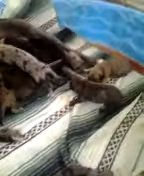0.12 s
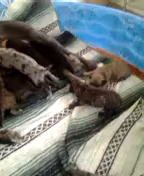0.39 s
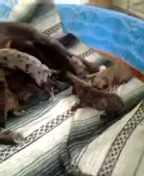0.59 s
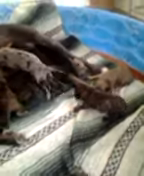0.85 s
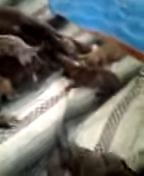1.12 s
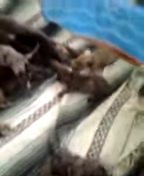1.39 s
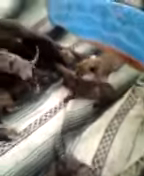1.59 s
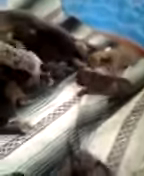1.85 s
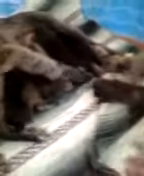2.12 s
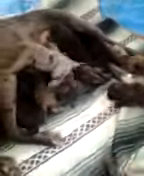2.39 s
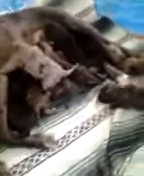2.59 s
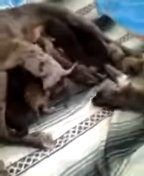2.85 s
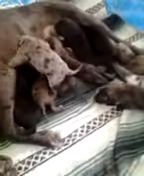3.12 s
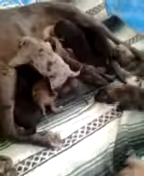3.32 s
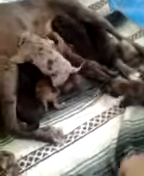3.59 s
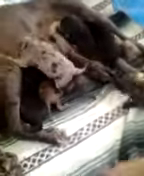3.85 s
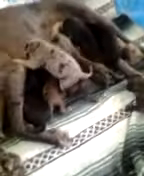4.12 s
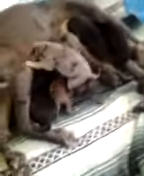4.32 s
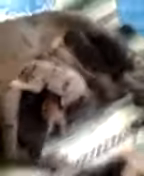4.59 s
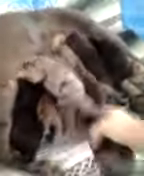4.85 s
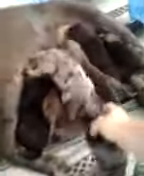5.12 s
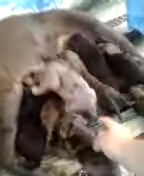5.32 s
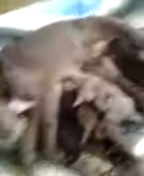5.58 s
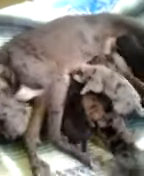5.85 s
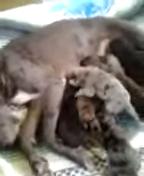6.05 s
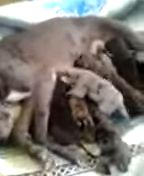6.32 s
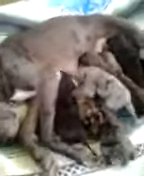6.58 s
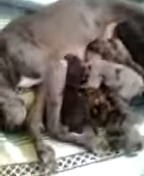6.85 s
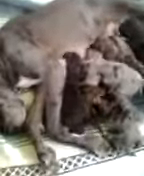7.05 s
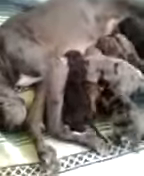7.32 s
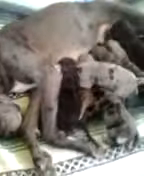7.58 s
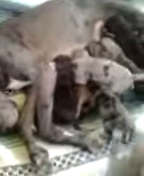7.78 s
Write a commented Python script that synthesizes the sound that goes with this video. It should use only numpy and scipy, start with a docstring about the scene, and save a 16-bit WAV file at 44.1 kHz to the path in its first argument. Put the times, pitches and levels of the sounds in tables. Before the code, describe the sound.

Hoarse puppy screams and sharp, distorting squeals give way to scattered short whines, low grunts and light cloth rubs in a small quiet room.

```python
"""Indoors on a blanket, newborn puppies crowd their mother close to a phone with a narrow-band microphone.
One pup gives hoarse screams, a trill and piercing squeals that overload the input; others whimper and grunt.
Voices are stacks of wavering harmonics, shaped by throat and mouth; breath, rustle and puffs are shaped noise.
Small ticks of paws are short ringing bursts, a short room ring follows voices and rasp, and the floor is quiet."""
import sys
import numpy as np
from scipy import signal
from scipy.fft import rfft, irfft
from scipy.io import wavfile
from scipy.ndimage import uniform_filter1d

SR = 44100
rng = np.random.default_rng(int(sys.argv[2]) if len(sys.argv) > 2 else 0)


def how_loud(loudness_db):
    """Turn decibels into a plain amplitude multiplier (0 dB gives 1, 20 dB gives 10)."""
    steps = np.asarray(loudness_db, float) / 20
    return 10 ** steps


def transcribe(u):
    """Save the signal u as a 16-bit wav file named by the first command-line argument.

    u: samples, shape (n,) or (channels, n), limited to [-1, 1]; the rate is SR.
    q: integer samples, one column per channel.
    """
    v = np.clip(np.atleast_2d(u).T, -1, 1)
    q = np.round(v * 32767).astype(np.int16)
    wavfile.write(sys.argv[1], SR, q)


N = 350154  # length [samples]

# Colour of the quiet background noise: (frequency [Hz], relative level [dB])
FLOOR_COLOUR = [(18, -57), (30, -28.5), (70, -10), (394, 1), (751, 5.5), (1110, -9), (1430, -7),
                (1910, -9.5), (2310, -1.5), (3280, -8.5), (4300, -25.5), (5590, -47.5), (9460, -120)]
# Steady rustle of the litter: (time [s], low part [dB], high part [dB])
RUSTLE = [(0, -56, -77.5), (.12, -53.5, -76), (.9, -57.5, -47.5), (1.06, -65, -55), (1.2, -61, -54),
          (1.902, -52, -54), (2.009, -62, -43), (2.258, -61.5, -48.5), (2.9, -58.5, -53), (3.3, -46.5, -51),
          (3.752, -60.5, -65.5), (4.029, -47.5, -51), (4.39, -60, -57.5), (4.679, -48.5, -51),
          (4.79, -57.5, -50.5), (5.249, -54, -50), (5.5, -56, -51), (6.0, -54.5, -51), (6.56, -67, -54.5),
          (7.101, -60, -54.5), (7.6, -53, -50), (7.94, -55, -70)]
# Colour of the low part of breath and rubbed cloth: (frequency [Hz], relative level [dB])
RASP_LOW_COLOUR = [(24, -66), (40, -26), (203, -18), (279, -15.5), (446, -12), (682, -8), (923, -3.5),
                   (1500, -5), (1950, -12), (3300, -120)]
# Colour of the high part when it is strong: (frequency [Hz], relative level [dB])
RASP_STRONG_COLOUR = [(880, -26.5), (1500, 2.5), (1800, -1.5), (2120, 3.5), (2550, -1), (3000, 1.5),
                      (3320, -8.5), (4300, -41), (5590, -60), (9460, -120)]
# Colour of the high part when it is gentle: (frequency [Hz], relative level [dB])
RASP_GENTLE_COLOUR = [(880, -37.5), (1500, -7.5), (1850, -1.5), (2010, -6), (2180, 2.5), (2930, -9),
                      (3200, -7.5), (3360, -10), (4300, -42), (5590, -69), (9460, -120)]
# How the throat favours some frequencies: (frequency [Hz], boost [dB])
THROAT = [(200, 1), (1000, 1.5), (1500, 2.5), (2000, 4), (2600, -1), (3100, 1), (3700, -10), (4400, -31),
          (9000, -90)]
# Soft whimpers: (start [s], length [s], start pitch [Hz], end pitch [Hz], level at the peak [dB],
#                 mouth resonance [multiple of the pitch])
WHIMPERS = [ (0.115, .04, 389, 413, -32, 2.6), (2.715, 0.141, 442.4, 566, -41, 1.6),
            (3.23, .16, 552, 671, -44, 1.2), (3.902, 0.092, 757.2, 785, -35.5, 1.3),
            (3.946, 0.055, 798, 795, -23, 1.55), (4.166, 0.086, 378.3, 494, -28.5, 2.3),
            (4.62, .05, 745, 725, -32, .9), (4.675, .1, 705, 770, -29, .8),
            (5.123, 0.088, 755.5, 695.7, -31.5, 1.5), (5.675, 0.054, 757, 721, -37, .8),
            (5.846, 0.0218, 626, 625, -40.5, .9), (5.895, 0.076, 729, 667, -33, .7),
            (6.049, 0.015, 607.6, 680, -35, .9), (6.107, 0.12, 713.8, 692.2, -31.5, 1.05),
            (6.365, 0.1015, 723, 717, -27.5, .9), (6.39, 0.1157, 880, 913, -36, .6),
            (6.633, 0.068, 724, 729, -24, .8), (6.676, 0.053, 440, 454, -36.5, 2.05),
            (6.911, 0.096, 735, 744, -28.5, .8), (7.148, 0.149, 953.4, 1026, -34, .6),
            (7.223, 0.0466, 900, 1110, -27.5, .9), (7.274, .04, 1000, 940, -33.5, 1.1),
            (7.528, 0.029, 666.2, 660, -33.5, 1.9), (7.546, 0.038, 363, 315, -36.5, 1.2),
            (7.744, 0.06, 679, 686, -27.5, 1.7), (7.787, 0.0468, 340.4, 353, -34, 1.4), ]
# Loud cries, one curve each: (time [s], pitch [Hz], voice level [dB],
#                              mouth resonance [multiple of the pitch], breath level [dB])
CRIES = [
    [(.148, 1134, -33, 1.2, -45), (.157, 1092, -15, 1.4, -26), (.179, 1183, -14, 1.3, -19),
     (.2, 1441, -12.5, 1.3, -18), (.24, 1458, -12, 1.6, -16), (.272, 1116, -15.5, 1.5, -14.5),
     (.28, 997, -17, 2.7, -20.5), (.335, 931.4, -29, 2.8, -29.5), (.381, 973.1, -26.5, 1.6, -29.5),
     (.467, 910.8, -24, 2.1, -27), (.52, 960.7, -17, 2.6, -25), (.556, 1018, -17, 2.7, -22),
     (.6, 1032, -16, 2.5, -18), (.628, 1087, -25, 2.1, -14), (.666, 1050, -32.5, 2.1, -21),
     (.724, 1086, -40, 2.1, -25.5), (.77, 1004, -40, 2.1, -39), (.83, 983, -61, 2.1, -56)],
    [(1.215, 596, -40.5, 2.1, -48), (1.229, 645.4, -29, 2.1, -43.5), (1.255, 850, -29, 2.1, -28),
     (1.27, 950, -14, 2.4, -19), (1.286, 1017, -14, 2.6, -15), (1.356, 1135, -15, 1.9, -21),
     (1.382, 1005, -15, 2.5, -25.5), (1.418, 1095, -21.5, 2.4, -25.5), (1.46, 884, -23.5, 2.1, -26.5),
     (1.475, 1386, -22.5, 1.2, -33), (1.52, 1183, -23, 1.1, -30.5), (1.545, 1221, -28.5, 1.3, -32),
     (1.565, 1146, -21.5, 1.5, -31), (1.6, 1212, -22.5, 1.4, -30.5), (1.62, 1102, -21, 1.3, -34),
     (1.66, 1117, -22, 1.6, -29), (1.68, 1004, -30.5, 1.1, -29), (1.784, 919, -49, 1.1, -32),
     (1.885, 972, -67, 1.1, -72.5)],
    [(2.92, 1064, -36, 1.9, -47), (2.94, 817.4, -15, 1.9, -35), (2.956, 955, -14.5, 2.1, -24.5),
     (2.98, 1228, -12, 2.2, -26), (3.0, 1295, -11, 1.45, -30), (3.03, 1402, -12, .9, -22.5),
     (3.05, 1488, -9.5, .6, -14), (3.07, 1380, -15.5, .8, -33.5), (3.085, 1284, -28, 1.2, -44.5),
     (3.11, 1008, -23, 1.9, -58.5)],
    [(3.37, 693.2, -38, 2.2, -37.5), (3.39, 773.4, -7.5, 2.05, -32.5), (3.402, 1023, -27, 2.1, -17.5),
     (3.418, 1223, -18, 1.9, -22.5), (3.485, 1348, -8.5, 1.3, -26.5), (3.5, 1473, -3.5, .7, -29),
     (3.532, 1408, -3.5, .8, -33), (3.545, 1453, -10.5, 1.15, -39), (3.58, 1457, -11.5, 1.15, -48),
     (3.636, 1465, -16.5, 1.1, -59), (3.66, 1460, -17.5, 1.2, -49), (3.69, 1428, -17, 1.2, -39),
     (3.71, 1423, -36.5, 1.35, -64), (3.86, 1435, -42.5, 1.5, -63)],
    [(4.405, 648.6, -43.5, 1.6, -47.5), (4.419, 627.6, -37, 1.2, -50.5), (4.438, 743, -30.5, 1.6, -47),
     (4.453, 836, -19.5, 2.1, -47), (4.505, 872.2, -27.5, 1.5, -43), (4.557, 893, -18, 1.9, -47.5),
     (4.6, 975, -20.5, 1.8, -29.5)],
    [(4.82, 1324, -49.5, 1.5, -40), (4.83, 1228, -13.5, 1.9, -34), (4.842, 1241, -3, 2.1, -39.5),
     (4.87, 1408, -7, 1.45, -25), (4.895, 1476, -5.5, 1.3, -17.5), (4.92, 1537, -6.5, .9, -25.5),
     (4.95, 1557, -11, 1.2, -37), (4.978, 1539, -16.5, 1.3, -44), (5.012, 1544, -7, .7, -47),
     (5.036, 1540, -8.5, .6, -57.5), (5.088, 1466, -19, 1.05, -43), (5.115, 1023, -29, 1.95, -39)],
]
# Strength of the strong-weak cycles, one entry for each cry, then the trill: (level [dB])
DOUBLING = [-10, -9, -40, -35, -45, -45, -30]
# Weight of the low breath, one entry for each cry, then the trill: (boost [dB])
CHEST = [6.5, 1.5, -2.5, -5, -3, 3, 2]
# Sharpness of the mouth resonance in a clear voice, each cry, then the trill: (loss setting [dB])
CLEAR_MOUTH = [16, 23, 28, 18.8, 12, 24, 30.3]
# A second whistle that rides beside the loud cries:
# (start [s], length [s], start pitch [Hz], end pitch [Hz], level [dB])
WHISTLES = [(.205, .075, 1300, 1020, -17), (1.265, .08, 900, 1000, -21), (0.297, 0.14, 1674, 877, -27.5),
            (0.533, 0.15, 1175, 1366, -25.5), (1.262, .065, 1380, 1300, -20),
            (3.035, .04, 1575, 1565, -11.5), (3.441, .06, 1469, 1530, -14.5),
            (3.488, .04, 3480, 3522, -32.5)]
# Ticks and smacks: (time [s], peak level [dB], centre of the ringing band [Hz], time to fade by 60 dB [s])
TICKS = [(1.078, -31.5, 2350, 0.02), (3.826, -39, 2070, 0.07), (3.885, -24.5, 1840, 0.043),
         (4.259, -43, 920, 0.044), (5.297, -25, 1860, 0.0223), (5.596, -20, 461, 0.08),
         (5.609, -24, 2390, 0.038), (5.633, -48.5, 2820, 0.036), (5.729, -28, 2098, 0.078),
         (5.951, -38, 1420, 0.04), (6.058, -30.5, 760, 0.088), (6.317, -29.5, 2140, 0.054),
         (7.044, -26, 1770, 0.18), (7.719, -33.5, 488, 0.0484), (7.89, -30, 1734, 0.061)]
# Rough low grunts: (start [s], length [s], start pitch [Hz], end pitch [Hz], level at the peak [dB],
#                    mouth resonance [multiple of the pitch])
GRUNTS = [(1.675, .07, 495, 455, -34, 1.8), (1.745, .12, 475, 522, -41.5, 1.1),
          (5.245, 0.076, 476, 440, -35.5, 0.7), (5.335, .11, 405, 415, -35.5, 2.05),
          (5.455, 0.28, 475.7, 529.8, -39, 0.38), (7.15, 0.14, 370, 376.5, -35.5, 2.6),
          (7.265, 0.086, 418.4, 509, -37, 1.4)]
# The trill between its throat flutters: (time [s], pitch [Hz], voice level [dB],
#                                         mouth resonance [multiple of the pitch], breath level [dB])
TRILL = [(2.275, 736, -32.5, 0.6, -44), (2.3, 856.2, -31.5, 0.86, -50.5), (2.32, 973.5, -15, 1.645, -35),
         (2.343, 1136, -13, 1.52, -23), (2.385, 1185, -13, 1.4, -22.5), (2.42, 1226, -11.5, 1.56, -27.5),
         (2.52, 1206, -20.5, 1.58, -35), (2.591, 1151, -12, 2.03, -43.5), (2.63, 1127, -13.5, 1.79, -46.5),
         (2.671, 1095, -21.5, 1.9, -51), (2.704, 817, -20.5, 1.6, -42.5)]
# Dips of pitch in the trill: (time of the lowest pitch [s], depth [Hz], fall time [s])
FLUTTERS = [(2.352, 300, .008), (2.397, 270, .006), (2.442, 230, .007), (2.493, 230, .008),
            (2.552, 180, .009), (2.611, 130, .011)]
# Short puffs of breath and soft rubs: (time [s], length [s], low part [dB], high part [dB])
PUFFS = [(2.729, 0.13, -32.5, -44.5), (3.821, 0.031, -44.5, -33), (3.888, 0.076, -39.5, -40),
         (5.586, .03, -33, -45), (5.598, 0.047, -35.5, -23.5), (3.66, .03, -46, -50),
         (4.198, 0.061, -35, -49), (4.626, 0.097, -33.5, -42.5), (5.099, 0.055, -47.5, -30),
         (5.366, .12, -31.5, -58), (6.425, 0.058, -34, -45), (6.944, .04, -35, -56),
         (5.709, 0.048, -36.5, -42), (5.939, 0.063, -39.5, -40.5), (6.136, 0.17, -40.5, -46.5),
         (6.306, 0.032, -43, -50), (7.033, 0.037, -40.5, -58), (7.274, 0.052, -33, -53),
         (7.61, 0.297, -61, -46.5), (7.695, 0.042, -46, -43.5)]

FLOOR_DB = -58  # middle of the wandering floor level, before it ducks
DUCK_AT_DB, DUCK_RATIO, DUCK_S = -21.5, 0.98, 0.27  # threshold, dB lost per dB above it, averaging time
SOFT_BREATH_DB = -18.5  # low breath relative to a soft call
HOARSE_MOUTH_DB = 4  # mouth loss setting when breath drowns the voice
BREATH_LOW_DB, BREATH_LOW_SLOPE = -23.5, 0.57  # low part of a cry's breath grows slower than its high part
ROOM_T60_S, ROOM_DB = 0.3656, -10.5  # time to fade by 60 dB, middle of the wandering ring level
BAND_TOP_HZ = 4085
OVERLOAD_LEVEL = 0.76  # largest sample value the input can hold


def walk(rate, n):
    """Smooth chance that turns about rate times a second; spread near 1."""
    k = max(int(SR / rate), 2)
    steps = np.repeat(rng.standard_normal(n // k + 1), k)
    return 1.2 * uniform_filter1d(uniform_filter1d(steps, k), k)[:n]


def colour(x, points):
    """Give a sound the spectrum of (Hz, dB) points, at rms 1."""
    hz, db = np.transpose(points)
    bins = np.maximum(np.arange(len(x) // 2 + 1) * SR / len(x), 1)
    gain = how_loud(np.interp(np.log(bins), np.log(hz), db))
    y = irfft(rfft(x) * gain, len(x))
    return y / np.sqrt(np.mean(y ** 2))


def add(out, start_s, x):
    """Mix a short sound in at a time."""
    i = int(start_s * SR)
    out[i:i + len(x)] += x[:len(out) - i]


def floor_ducking(loud):
    """Gain of the background noise, which sinks while a loud cry lasts and recovers after it."""
    keep = np.exp(-1 / (DUCK_S * SR))
    power = signal.lfilter([1 - keep], [1, -keep], loud ** 2)
    power_db = 10 * np.log10(power + 1e-12)
    return how_loud(-DUCK_RATIO * np.maximum(power_db - DUCK_AT_DB, 0))


def quiet_floor(voices):
    """Coloured background noise that wanders in level and ducks under the cries."""
    level = how_loud(FLOOR_DB + 6 * walk(12, N))
    return colour(rng.standard_normal(N), FLOOR_COLOUR) * level * floor_ducking(voices)


def rustle():
    """Low and high gains of the steady rustle, each flickering at its own pace."""
    s, low_db, high_db = np.transpose(RUSTLE)
    t = np.arange(N) / SR
    low = how_loud(np.interp(t, s, low_db) + 0.83 * walk(39, N))
    high = how_loud(np.interp(t, s, high_db) + 0.5 * walk(17, N))
    return np.array([low, high])


def rasp(gains):
    """Turbulent air and rubbed cloth: grainy noise in a low and a high part; harder effort is brighter."""
    low, high = (uniform_filter1d(part, int(.008 * SR)) for part in gains)  # 8 ms smoothing
    effort = np.clip((20 * np.log10(high) + 40) / 12, 0, 1)  # 0 = gentle, 1 = strong
    air = rng.standard_normal(N)
    bright = effort * colour(air, RASP_STRONG_COLOUR) + (1 - effort) * colour(air, RASP_GENTLE_COLOUR)
    dull = colour(rng.standard_normal(N), RASP_LOW_COLOUR)
    low_grain = how_loud(0.6 * walk(60, N))
    high_grain = how_loud(2.0 * walk(77, N))
    return dull * low * low_grain + bright * high * high_grain


def vocal_folds(t, hz, levels_db, jitter, shimmer_db, edge_s, half_db=-60.5):
    """Harmonics of one wavering pitch; each flickers alone, strong-weak cycles add lines half-way between."""
    waver = walk(260, len(t)) + .5 * walk(45, len(t))
    phase = 2 * np.pi * np.cumsum(hz * (1 + jitter * waver)) / SR
    fade = np.clip(np.minimum(t - t[0], t[-1] - t) / edge_s, 0, 1)
    doubling = 1 + how_loud(half_db + 0.54 * walk(21.4, len(t))) * np.cos(phase / 2)
    harmonics = 0
    for k, db in enumerate(levels_db, start=1):
        level = np.sqrt(2) * how_loud(db + shimmer_db * walk(121.2, len(t)))  # rms to peak of a sine
        harmonics = harmonics + level * np.sin(k * phase)
    return fade * doubling * harmonics


def overtones(hz, db, mouth, mouth_db):
    """Levels of five harmonics: favoured near the mouth resonance, coloured by the throat, summing to db."""
    k = np.arange(1, 6)[:, None]
    throat_hz, throat_db = np.transpose(THROAT)
    away = (k - mouth) * np.sqrt(hz / 1200)  # harmonics of a low voice lie closer
    mouth_loss_db = mouth_db * away ** 2 / np.sqrt(.5 + .5 * away ** 2)
    shape_db = np.interp(np.log(k * hz), np.log(throat_hz), throat_db) - mouth_loss_db
    shape_db = np.maximum(shape_db, shape_db.max(axis=0) - 47.5)
    return db + shape_db - 10 * np.log10(np.sum(how_loud(shape_db) ** 2, axis=0))


def soft_call(row, mouth_db, peak, rise_db, fall_db, jitter, shimmer_db, half_db):
    """A short call that swells to a peak and sinks while its pitch glides; its breath follows more gently."""
    start, length, from_hz, to_hz, db, mouth = row
    t = np.arange(0, length, 1 / SR)
    hz = from_hz + (to_hz - from_hz) * t / length
    swell_db = np.interp(t / length, [0, peak, 1], [-rise_db, 0, -fall_db])
    levels_db = overtones(hz, db + swell_db, mouth, mouth_db)
    voice = vocal_folds(t, hz, levels_db, jitter, shimmer_db, .004, half_db)
    low_breath = how_loud(db + SOFT_BREATH_DB + 0.76 * swell_db)
    return start, voice, low_breath


def whimper(row):
    """A soft call with a quick rise and a fairly steady pitch."""
    attack_s = .016
    return soft_call(row, mouth_db=25.5, peak=attack_s / row[1], rise_db=13.5, fall_db=16,
                     jitter=.027, shimmer_db=3.5, half_db=-21.)


def loud_cry(table, half_db, chest_db, clear_db, flutters=()):
    """A cry and its breath: breath near the voice level makes the folds hoarser and the mouth wider."""
    s, *columns = np.transpose(table)
    t = np.arange(s[0] - .004, s[-1] + 0.0013, 1 / SR)
    hz, db, mouth, breath_db = (np.interp(t, s, c) for c in columns)
    hoarse = np.minimum(how_loud(breath_db - db), 1)
    dip_hz = 0
    for at, depth_hz, fall_s in flutters:
        width_s = np.where(t < at, fall_s, 2.1 * fall_s)  # the pitch climbs back more slowly
        dip_hz = dip_hz + depth_hz * np.exp(-((t - at) / width_s) ** 2)
    mouth_db = clear_db + (HOARSE_MOUTH_DB - clear_db) * np.sqrt(hoarse)
    levels_db = overtones(hz, db, mouth, mouth_db)
    # in a flutter the fundamental leaves the throat resonance and the third harmonic enters the upper one
    levels_db = levels_db + np.array([[-.025], [0], [.045], [0], [0]]) * dip_hz
    jitter = .007 + .075 * hoarse ** 1.3
    voice = vocal_folds(t, hz - dip_hz, levels_db, jitter, 1.8 + 2.5 * hoarse, .006, half_db)
    low_breath = how_loud(chest_db + BREATH_LOW_DB + BREATH_LOW_SLOPE * breath_db)
    return t[0], voice, low_breath, how_loud(breath_db)


def whistle(row):
    """One gliding, wavering tone beside a cry, without breath."""
    start, length, from_hz, to_hz, db = row
    t = np.arange(0, length, 1 / SR)
    hz = from_hz + (to_hz - from_hz) * t / length
    return start, vocal_folds(t, hz, [db], .03, 3.5, .01)


def ticks():
    """A burst of noise ringing in a band at each small contact."""
    out, t = np.zeros(N), np.arange(int(.12 * SR)) / SR
    contact = 1 - np.exp(-t / .0015)  # soft paws build up over a millisecond or two
    for at, db, hz, t60 in TICKS:
        band = signal.butter(3, [hz / 1.3, hz * 1.3], "bandpass", fs=SR, output="sos")
        decay = np.exp(-np.log(1000) * t / t60)
        burst = signal.sosfilt(band, rng.standard_normal(len(t)) * contact * decay)
        add(out, at, how_loud(db) * burst / np.abs(burst).max())
    return out


def grunt(row):
    """A soft call made rough by a strongly wavering pitch."""
    return soft_call(row, mouth_db=24.5, peak=0.27, rise_db=3.5, fall_db=10,
                     jitter=.085, shimmer_db=5., half_db=-30.)


def trill():
    """A loud cry in which each throat flutter pulls the pitch down and lets it climb back."""
    return loud_cry(TRILL, DOUBLING[-1], CHEST[-1], CLEAR_MOUTH[-1], FLUTTERS)


def puffs():
    """Low and high gains of short puffs and rubs: a quick rise, then a fade."""
    gains, t = np.zeros((2, N)), np.arange(N) / SR
    for at, length, low_db, high_db in PUFFS:
        rise = np.clip((t - at) / 0.022, 0, 1)
        shape = rise * np.exp(-2.5 * np.maximum(t - at - .012, 0) / length)
        gains += how_loud([[low_db], [high_db]]) * shape
    return gains


def litter():
    """All voices, and the low and high breath gains that go with them."""
    calls = [whimper(row) for row in WHIMPERS]
    # zip stops after the last cry, so the trill's own entries are left over for trill()
    calls += [loud_cry(*settings) for settings in zip(CRIES, DOUBLING, CHEST, CLEAR_MOUTH)]
    calls += [whistle(row) for row in WHISTLES]
    calls += [grunt(row) for row in GRUNTS]
    calls.append(trill())
    tracks = np.zeros((3, N))  # voice, low breath, high breath
    for start, *layers in calls:
        for track, layer in zip(tracks, layers):
            add(track, start, layer)
    return tracks[0], tracks[1:]


def room(x):
    """A short diffuse ring off near walls; its level wavers at random."""
    t = np.arange(int(.8 * SR)) / SR
    ring = rng.standard_normal(len(t)) * np.exp(-np.log(1000) * t / ROOM_T60_S) * (t > .004)
    wet = signal.fftconvolve(x, ring / np.sqrt(np.sum(ring ** 2)))[:N]
    return x + wet * how_loud(ROOM_DB + 3.9 * walk(70, N))


def scene():
    """Voices and rasp ring in the room; ticks lie around them, and the floor ducks under the cries."""
    voices, breath = litter()
    rough_air = rasp(breath + rustle() + puffs())
    mix = room(voices + rough_air) + ticks() + quiet_floor(voices)
    return mix[None]  # one channel


def top_cut(x):
    """Nothing passes above the cut-off."""
    return signal.sosfilt(signal.butter(12, 16410, fs=SR, output="sos"), x)


def record(dry):
    """A telephone-band input: a steep cut of the treble, then hard overload on the loudest squeals."""
    low_pass = signal.ellip(8, .3, 80, BAND_TOP_HZ, fs=SR, output="sos")
    narrow = signal.sosfilt(low_pass, dry)
    finished = np.clip(narrow, -OVERLOAD_LEVEL, OVERLOAD_LEVEL)
    return top_cut(finished)


dry = scene()
out = record(dry)
transcribe(out)
```